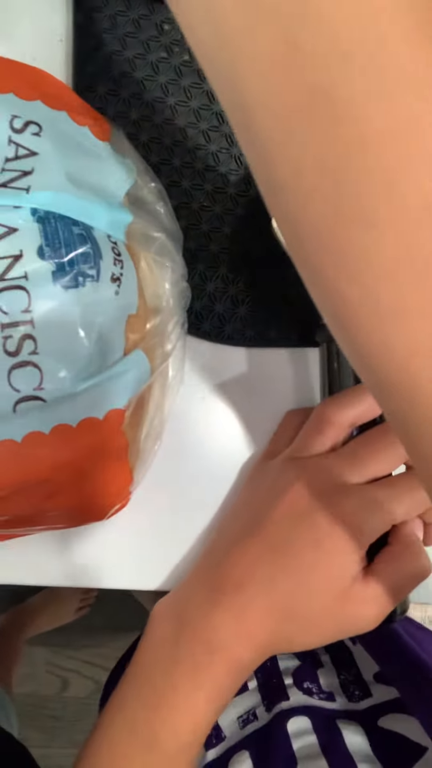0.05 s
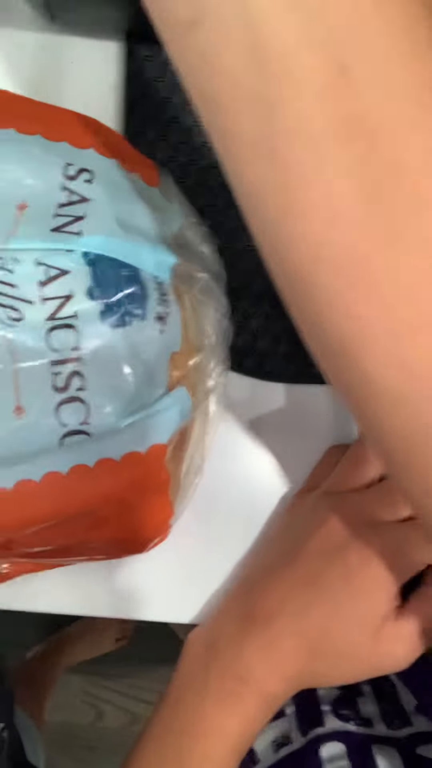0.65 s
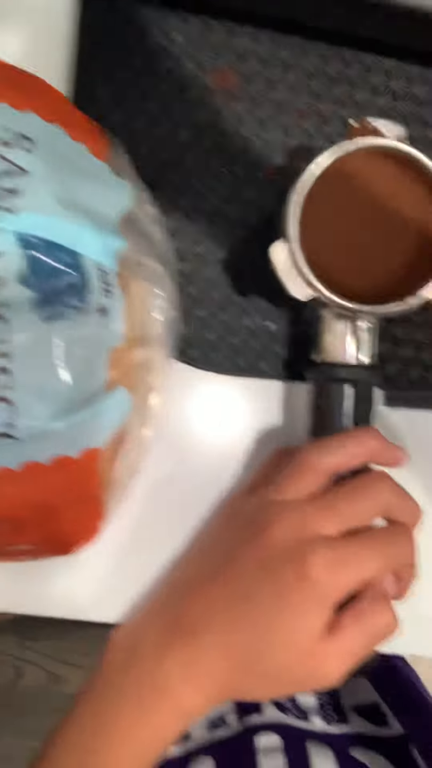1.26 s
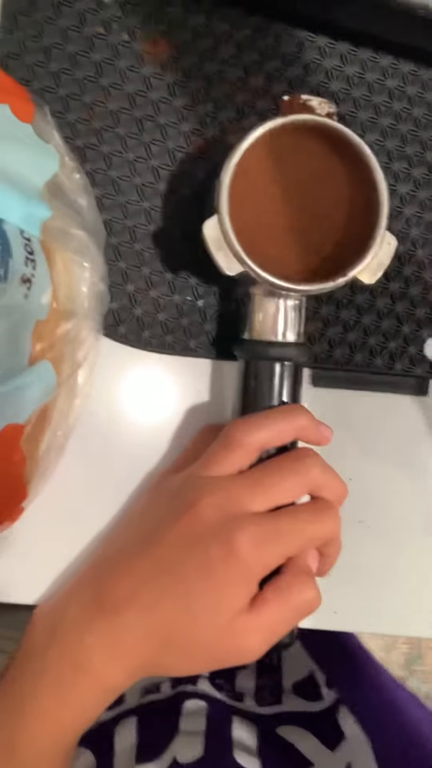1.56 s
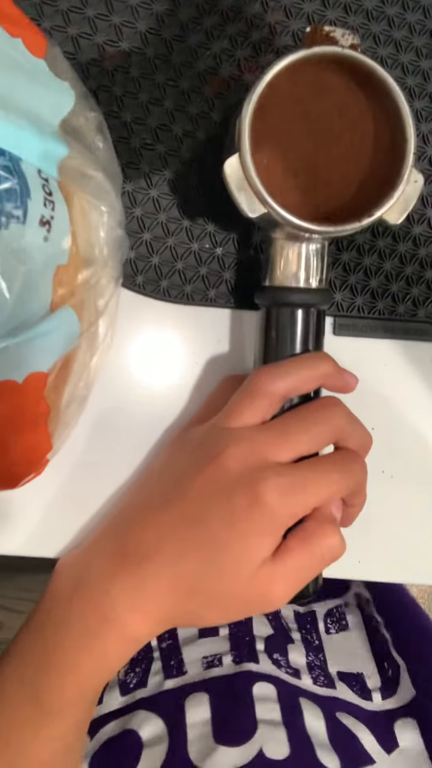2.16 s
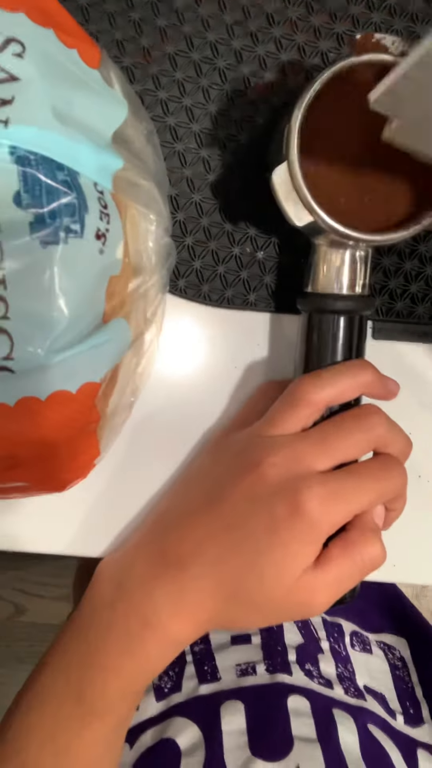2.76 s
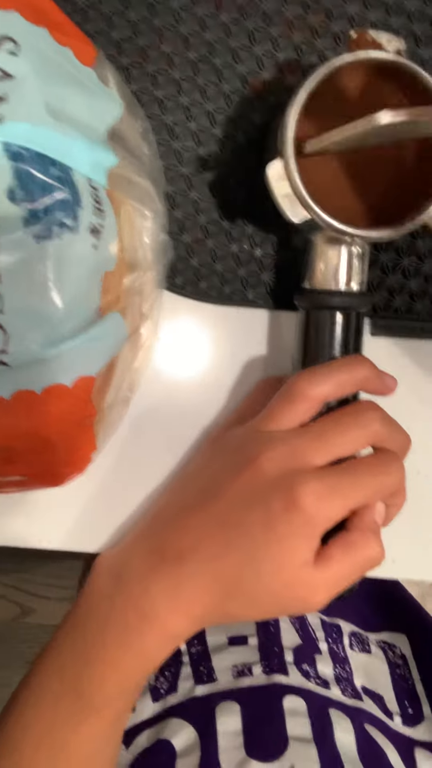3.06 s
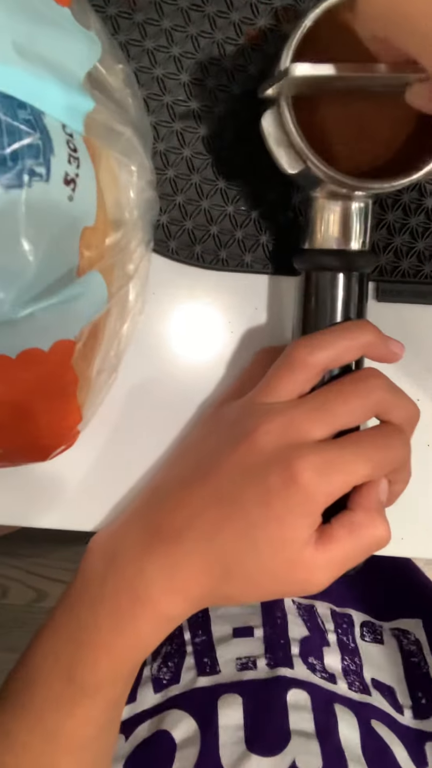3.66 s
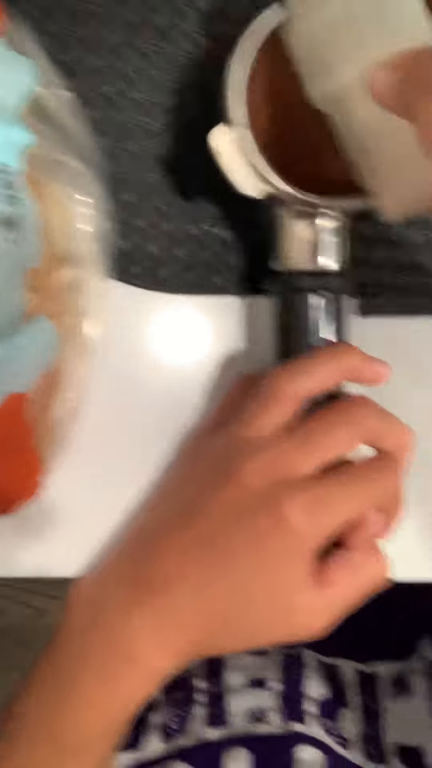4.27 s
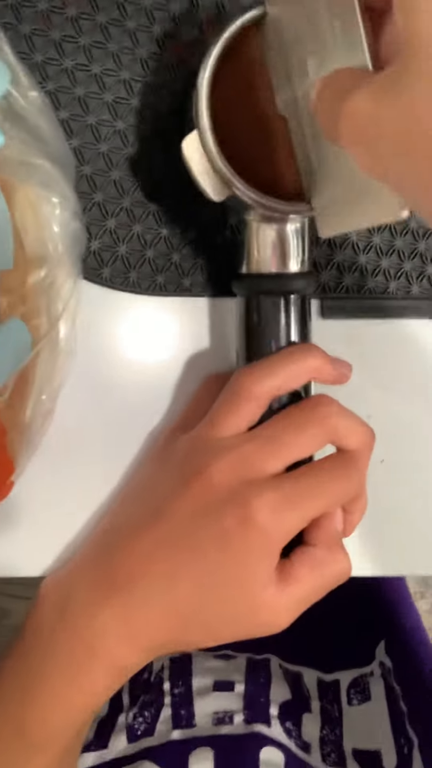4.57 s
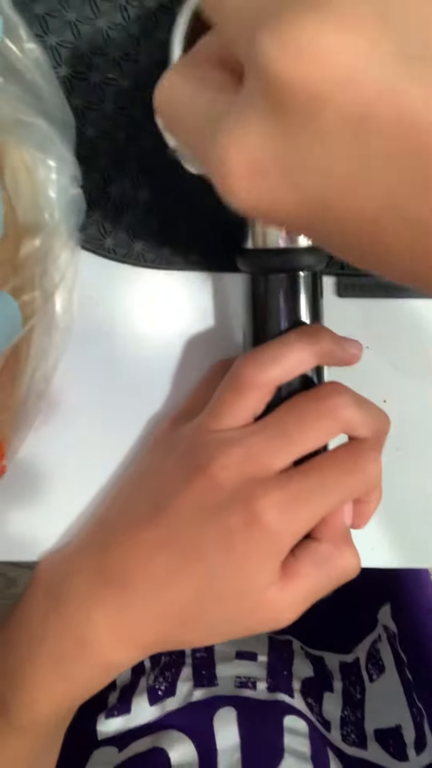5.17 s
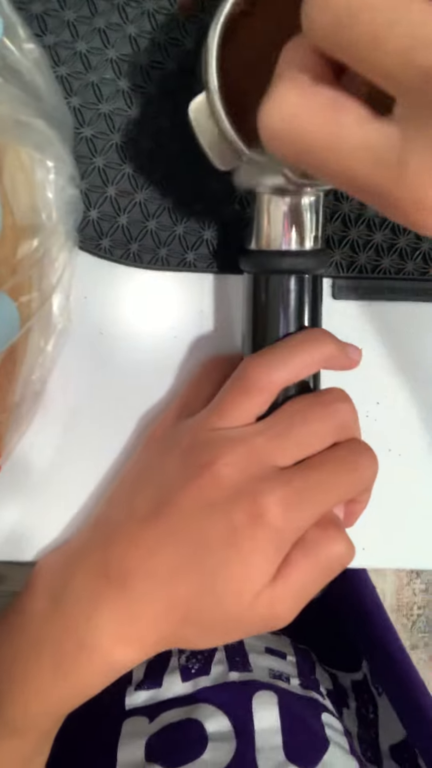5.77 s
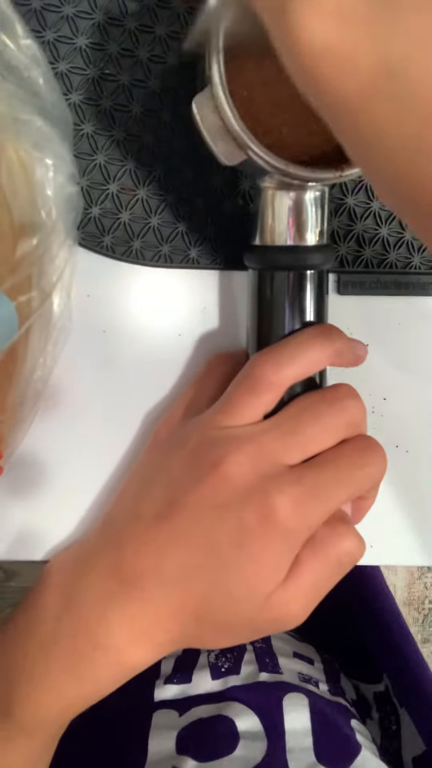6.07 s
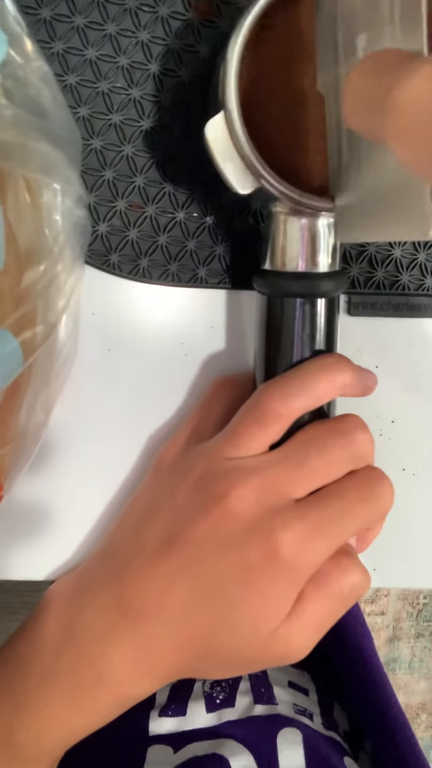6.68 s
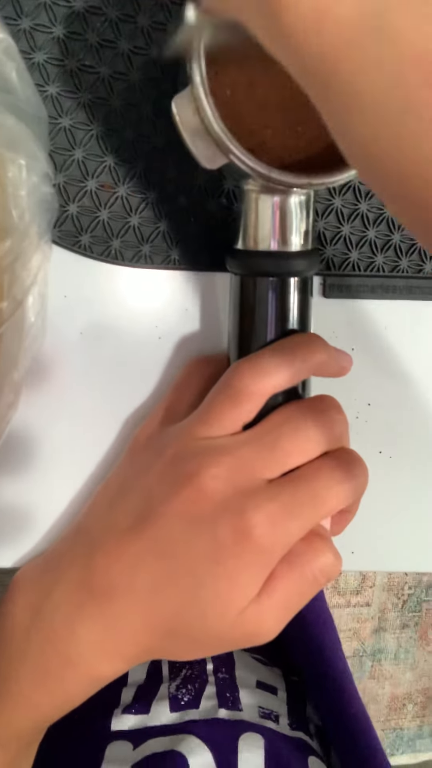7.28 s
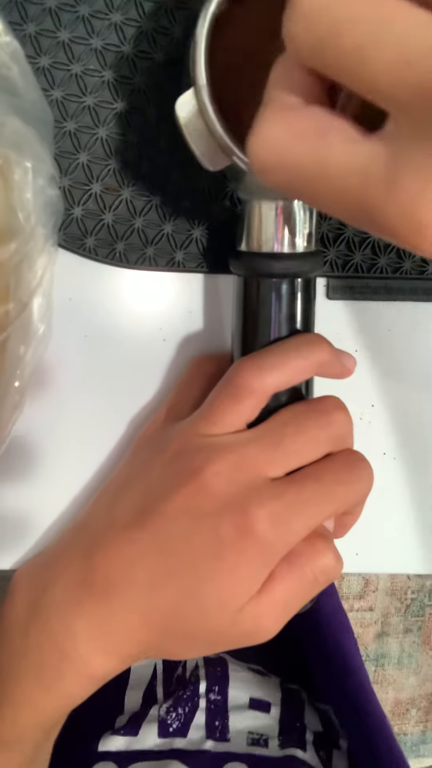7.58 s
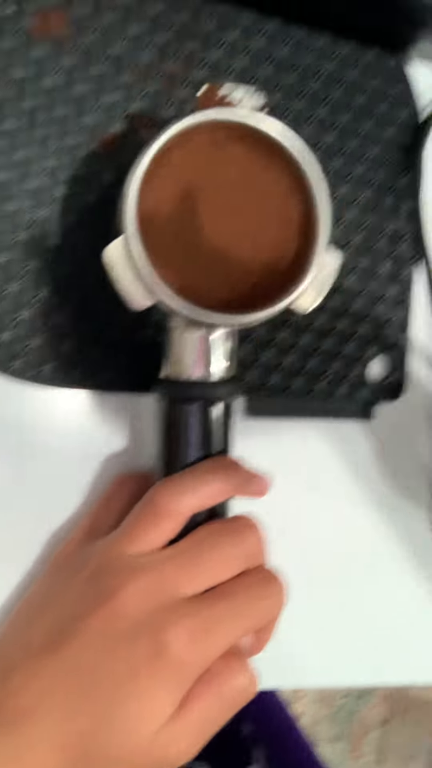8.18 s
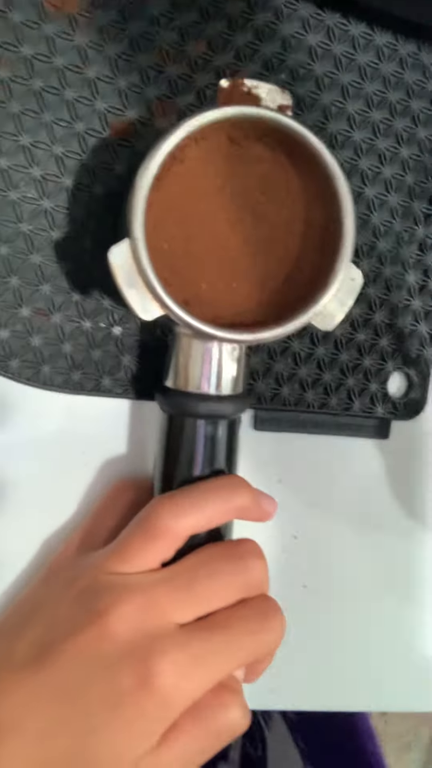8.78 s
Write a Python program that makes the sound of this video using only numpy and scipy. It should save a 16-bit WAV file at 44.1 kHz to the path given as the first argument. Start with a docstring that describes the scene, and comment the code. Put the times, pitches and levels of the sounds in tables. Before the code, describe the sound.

A steel coffee filter holder rubs briefly on a rubber mat and lands with sharp, clinking knocks at about 0.15 and 0.25 seconds. Another hard clack comes at 0.8 seconds, with light taps around it. At 1.6 seconds the holder drags with a short metallic rasp that ends in a loud, briefly ringing clank. Faint tinkles, ticks and finger rustles follow as a thin steel blade is picked up. From about 3.7 to 7.9 seconds the blade turns through the coffee grounds in four quiet strokes, a gritty scraping rustle with a thin hiss on the rim, slight hollow judders, tiny squeaks and an occasional tick. Light taps come around 8 seconds, and the holder is set down with a quick clatter near 8.9 seconds. Everything is close, with a little kitchen reverberation and a faint low rumble underneath.

```python
"""Levelling coffee in a portafilter.

A steel portafilter full of grounds is knocked, dragged and set down on a rubber mat; each blow rings its modes.
A thin steel blade turns round the basket, scraping by stick-slip and ticking on the rim, then the
handle is put down again. Two close microphone ports hear it over a low kitchen rumble."""
import sys
import numpy as np
from scipy import signal
from scipy.fft import rfft, irfft, next_fast_len
from scipy.io import wavfile
from scipy.ndimage import uniform_filter1d, map_coordinates

SR = 44100
rng = np.random.default_rng(int(sys.argv[2]) if len(sys.argv) > 2 else 0)


def file_out(sig):
    """Save sig as 16-bit WAV at sys.argv[1]."""
    # one column per channel
    cols = np.atleast_2d(sig).T
    # limit, then scale
    lim = np.clip(cols, -1, 1)
    pcm = np.round(lim * 32767).astype(np.int16)
    wavfile.write(sys.argv[1], SR, pcm)


N = 398223
TIME_S = np.arange(N) / SR


def amp(db):
    """Decibels to gain."""
    return 10 ** (np.asarray(db) / 20)


def unit(x):
    """Scale to rms 1."""
    return x / np.sqrt(np.mean(x ** 2) + 1e-20)


def along(points, hz):
    """Read (frequency, value) points on a log axis."""
    f, values = np.transpose(points)
    return np.interp(np.log(hz + 1), np.log(f + 1), values)


def gains(rows):
    """Smoothed gain curve per dB column, silent outside the rows."""
    s, *columns = np.transpose(rows)
    curves_db = [np.interp(TIME_S, s, column, left=-150, right=-150) for column in columns]
    return [uniform_filter1d(amp(db), size=300) for db in curves_db]


def bursts(table, attack_s, release_s):
    """Gain curve: each (start, length, level) row rises, holds and decays."""
    gain = np.zeros(N)
    for s, length, db in table:
        age = TIME_S - s
        gain += amp(db) * np.exp(np.minimum(age, 0) / attack_s - np.maximum(age - length, 0) / release_s)
    return gain


def wobble(rate_hz):
    """Smooth random curve with knots at rate_hz."""
    return map_coordinates(rng.standard_normal(int(N * rate_hz / SR) + 4), [TIME_S * rate_hz])


def slips(rate_hz, spread_db):
    """Stick-slip: tiny uneven pushes at random times."""
    size = rng.standard_normal(N) * amp(spread_db * rng.standard_normal(N))
    return unit(size * (rng.random(N) < rate_hz / SR))


def add(track, s, sound):
    """Mix a sound in at time s."""
    part = track[..., round(s * SR):][..., :sound.shape[-1]]
    part += sound[..., :part.shape[-1]]


def filtered(x, response):
    """Apply a complex frequency response."""
    size = x.shape[-1]
    padded = next_fast_len(size + 8192)
    return irfft(rfft(x, padded) * response(np.fft.rfftfreq(padded, 1 / SR)), padded)[..., :size]


def coloured(x, spectrum):
    """Apply a (frequency [Hz], gain [dB]) curve."""
    return filtered(x, lambda hz: amp(along(spectrum, hz)))


def resonant(x, peaks):
    """Parallel resonances: (centre [Hz], width [Hz], gain [dB])."""
    return filtered(x, lambda f: sum(amp(db) * 1j * f * width / (hz * hz - f * f + 1j * f * width)
                                     for hz, width, db in peaks))


def twice_resonant(x, hz, width_hz):
    """Two equal resonances in series."""
    peak = [(hz, width_hz, 0)]
    return resonant(resonant(x, peak), peak)


def narrow_note(path_hz, width_hz):
    """Stick-slip note: narrow noise round a moving pitch."""
    phase = 2 * np.pi * np.cumsum(path_hz) / SR
    a, b = filtered(rng.standard_normal((2, N)), lambda hz: 1 / (1 + 1j * hz / width_hz) ** 2)
    return unit(a * np.cos(phase) + b * np.sin(phase))


def patchy(x, depth_db, span_hz, span_s):
    """Uneven contact: patches of the spectrum swell and fade."""
    hz, t, spectra = signal.stft(x, SR, nperseg=1024)
    grid = np.meshgrid(hz / span_hz, t / span_s, indexing='ij')
    field = map_coordinates(rng.standard_normal((128, 128)), grid, order=1, mode='mirror')
    return signal.istft(spectra * amp(depth_db * field), SR, nperseg=1024)[1][:len(x)]


# Port phase: (frequency [Hz], left minus right [rad])
PORT_PHASE = [(60, 0), (300, -.25), (440, -.6), (580, -1.7), (820, -2.8), (1300, -2.1), (1900, -1.6),
              (3600, -2.1), (5500, -3.7), (6550, -6.2), (9400, -7.5), (12000, -8.9), (16000, -9.4)]
# Port balance: (frequency [Hz], left minus right [dB])
PORT_BALANCE = [(60, 2), (200, 4), (330, 5), (500, 2), (770, -1), (4000, 0.64)]


def ports(x):
    """A close source reaches the left port later, and louder in the low mids."""
    half = np.array([[.5], [-.5]])
    return filtered(x, lambda hz: amp(half * along(PORT_BALANCE, hz))
                    * np.exp(1j * half * along(PORT_PHASE, hz)))


def placed(x):
    """Both ports, with their mean at rms 1."""
    pair = ports(x)
    return pair / pair.mean(0).std()


# Rumble and hiss spectra: (frequency [Hz], gain [dB])
RUMBLE_SPECTRUM = [(13, -49), (22, -23.5), (41, -3.5), (70, 7), (118, 1), (173, -6.5), (269, -12.5),
                   (353, -26.5), (430, -28.5), (550, -45), (920, -120)]
AIR_SPECTRUM = [(180, -25.5), (300, -4.5), (842, -24.5), (1510, -19.5), (4020, -29.5), (6850, -31.5),
                (10600, -30.5), (12300, -50), (16000, -50.5)]
# Rumble envelope: (time [s], relative level [dB])
RUMBLE_ENVELOPE = [(0.0, -57), (0.35, -52), (1.23, -62), (1.68, -53), (2.04, -63), (2.49, -58),
                   (3.59, -70.5), (3.9, -64.5), (5.1, -66), (5.43, -54), (6.77, -69), (7.34, -62),
                   (7.47, -65), (8.9, -60.5), (9.03, -59)]


def background():
    """Restless low rumble, weak wavering hum, faint hiss."""
    rumble = placed(coloured(rng.standard_normal(N), RUMBLE_SPECTRUM))
    rumble *= gains(RUMBLE_ENVELOPE)[0] * amp(3.5 + 2.8 * wobble(14))
    hum = amp(-68.5 + 1.3 * wobble(0.91)) * np.sin(2 * np.pi * 111 * TIME_S + 3.3 * wobble(18))
    hiss = amp(-76.5) * unit(coloured(rng.standard_normal((2, N)), AIR_SPECTRUM))
    return rumble + hum + hiss


# Room decay: (frequency [Hz], t60 [s])
ROOM_DECAY = [(150, 0.45), (500, .52), (1500, 0.48), (4000, 0.33), (9000, 0.24), (13000, 0.1)]
# Wall reflection: (frequency [Hz], gain [dB])
WALL_SPECTRUM = [(100, -6.5), (400, 3), (1500, -1.5), (5000, 1), (10000, 2), (14000, -14)]


def kitchen(x):
    """The coffee machine reflects first; the walls' tail follows, dying faster in the treble."""
    hz, t, spectra = signal.stft(rng.standard_normal((2, SR * 3 // 4)), SR, nperseg=256)
    decay = amp(along(WALL_SPECTRUM, hz)[:, None] - 60 * t / along(ROOM_DECAY, hz)[:, None])
    tail = signal.istft(spectra * decay, SR, nperseg=256)[1]
    age = np.arange(tail.shape[1]) / SR
    early = amp(3 - 60 * age / 0.09)
    response = tail / np.linalg.norm(tail[0]) * (1 + early) * (age > .002)
    return signal.fftconvolve(x, response, axes=1)[:, :N]


# Finger shifts and grip squeezes: (start [s], length [s], level [dB])
FINGER_SHIFTS = [(2.44, 0.13, -83), (3.26, 0.077, -82.5), (5.72, 0.029, -77.5), (8.76, 0.2, -67)]
SQUEEZES = [(2.41, 0.06, -77.5), (2.55, 0.066, -72), (3.272, 0.042, -70), (3.46, 0.069, -70.5),
            (5.645, 0.035, -72.5)]
# Skin friction: (frequency [Hz], gain [dB])
SKIN_SPECTRUM = [(200, -6), (500, 3), (700, -11.5), (1000, -10), (2200, -8), (4000, -18.5), (10000, -31)]


def fingers():
    """Skin rustles on handle and blade; a squeeze gives a hollow rub."""
    pressure = bursts(FINGER_SHIFTS, attack_s=0.0086, release_s=0.036) * amp(1.8 * wobble(32))
    rub = placed(twice_resonant(slips(3100, spread_db=6), hz=486, width_hz=120))
    rustle = placed(coloured(slips(3800, spread_db=-3.5), SKIN_SPECTRUM))
    return pressure * rustle + bursts(SQUEEZES, attack_s=0.004, release_s=0.013) * rub


# Rim modes: (frequency [Hz], width [Hz], relative level [dB])
RIM_RESONANCES = [(6850, 140, -4), (9000, 130, 2.5), (10650, 110, -3), (12550, 110, -8)]


def rim_ring(swell_db, drift_hz):
    """Rim modes swell unevenly and wander as the contact point moves."""
    return unit(sum(amp(db + swell_db * wobble(8.3)) * narrow_note(hz + drift_hz * wobble(9.1), width)
                    for hz, width, db in RIM_RESONANCES))


# Blade picked up and brought to the basket: (start [s], length [s], level [dB])
PICKUP_SCUFFS = [(2.045, 0.012, -68), (2.07, .11, -82), (2.345, 0.019, -77.5), (2.44, 0.026, -80.5),
                 (2.495, 0.0095, -71), (2.615, 0.0187, -68), (2.93, 0.035, -81.5), (3.271, 0.0072, -70.5)]


def tinkles():
    """Short dry scuffs set thin steel ringing faintly."""
    bright = [(1200, -12), (3000, 8), (4800, -3), (9000, 0), (13000, 1), (15000, -20)]
    scratch = unit(coloured(slips(2500, spread_db=3), bright))
    tinkle = placed(rim_ring(swell_db=3, drift_hz=30) + amp(-3.5) * scratch)
    return tinkle * bursts(PICKUP_SCUFFS, attack_s=0.0034, release_s=0.009)


# Blade squeaks: (start [s], length [s], pitch [Hz], relative level [dB])
EDGE_SQUEAKS = [(3.959, 0.15, 1156, -72.5), (5.987, 0.05, 1710, -72), (6.26, 0.14, 1220, -64.5),
                (7.654, 0.16, 3230, -78)]


def squeaks():
    """Stick-slip at the edge drives one narrow resonance at a time."""
    out = np.zeros(N)
    for s, length, hz, db in EDGE_SQUEAKS:
        tone = unit(twice_resonant(slips(3500, spread_db=3), hz, width_hz=300))
        out += tone * bursts([(s, length, db)], attack_s=0.01, release_s=0.012)
    return amp(11.5) * ports(out)


# Blade turns: (peak time [s], half width [s])
BLADE_TURNS = [(3.869, 0.24), (4.98, 0.25), (6.011, 0.12), (7.249, 0.11)]


def turning(x, low_hz, top_hz, width_hz, boost_db):
    """The scrape's resonance climbs and falls back once a stroke as the blade turns."""
    hz, t, spectra = signal.stft(x, SR, nperseg=1024)
    height = sum(np.exp(-((t - s) / half_width) ** 4) for s, half_width in BLADE_TURNS)
    centre_hz = low_hz + (top_hz - low_hz) * height
    offset = (hz[:, None] - centre_hz) / width_hz
    return signal.istft(spectra * amp(boost_db / (1 + offset ** 2)), SR, nperseg=1024)[1][:len(x)]


# Shaved coffee: (frequency [Hz], gain [dB])
GROUNDS_SPECTRUM = [(120, -3.5), (280, -0.5), (400, -4), (700, -0.5), (950, -3), (1200, 1), (1550, -5),
                    (1900, -2.5), (2600, -9), (3300, -9), (4200, -10.5), (5200, -25.5), (7000, -33)]


def grounds_crunch():
    """Fine grounds crunch densely; coarse grains snap one by one."""
    fine = patchy(slips(6000, spread_db=2), depth_db=5, span_hz=150, span_s=.07)
    coarse = slips(220, spread_db=1)
    crunch = coloured(unit(fine) + amp(-9) * coarse, GROUNDS_SPECTRUM)
    return placed(turning(crunch, low_hz=1227, top_hz=1830, width_hz=170, boost_db=7))


# Blade on rim: (frequency [Hz], gain [dB])
RIM_SPECTRUM = [(4500, -23), (5700, -15), (6500, -10.5), (7600, -6), (8300, -3), (9100, 5), (9800, -5),
                (10700, -0.5), (11600, -12.5), (12500, 3.5), (14000, -15), (16000, -38)]


def rim_hiss():
    """The edge slips over burrs and rings the rim."""
    burrs = patchy(slips(6000, spread_db=2), depth_db=5, span_hz=260, span_s=.11)
    ring = amp(0.5) * rim_ring(swell_db=3.5, drift_hz=45.2)
    return placed(unit(coloured(burrs, RIM_SPECTRUM)) + ring) * amp(1.2 * wobble(11))


# Catching edge: (frequency [Hz], gain [dB])
CATCH_SPECTRUM = [(400, -5.5), (1000, 3), (1800, 7), (2500, -8), (3400, -3), (4300, -8), (5300, -12),
                  (6500, -17.5), (8000, -12.5), (14000, -35.5)]


def catch_rasp():
    """Rough stick-slip of a catching edge."""
    bite = coloured(slips(4000, spread_db=3), CATCH_SPECTRUM)
    return placed(patchy(bite, depth_db=4.5, span_hz=204, span_s=.05))


# Blade flex note: (time [s], pitch [Hz])
FLEX_NOTE = [(3.759, 560), (4.08, 517), (4.18, 530), (4.33, 482), (4.93, 460), (5.12, 509), (5.25, 507.2),
             (5.45, 487.8), (7.2, 475.3), (7.46, 482.8), (7.61, 531), (7.78, 481.6)]


def blade_flex():
    """The blade's hollow note bends as it is pressed and turned."""
    skirt = unit(twice_resonant(slips(2000, spread_db=3), hz=505.5, width_hz=95))
    pitch_hz = np.interp(TIME_S, *np.transpose(FLEX_NOTE)) + 13 * wobble(22)
    return placed(narrow_note(pitch_hz, width_hz=36) + amp(-5) * skirt)


# Four strokes, one curve each: (time [s], relative grounds level [dB], relative rim level [dB])
BLADE_STROKES = [
    [(3.69, -85, -90.5), (3.768, -62.5, -74), (3.884, -69.5, -77.5), (4.076, -56, -70), (4.1, -65.5, -75.5),
     (4.146, -57, -62.5), (4.386, -73.5, -76.5), (4.42, -63.5, -69), (4.53, -86, -106)],
    [(4.56, -97, -105), (4.608, -60, -61.5), (4.846, -59, -65), (4.868, -54.5, -77), (4.89, -62.5, -70),
     (4.986, -60, -60.5), (5.35, -65.5, -76), (5.426, -62.5, -71), (5.49, -85, -91)],
    [(5.68, -73, -87), (5.862, -61, -67.5), (5.996, -65.5, -84), (6.02, -60.5, -71), (6.056, -65, -73),
     (6.358, -60, -65.5), (6.376, -57, -59), (6.656, -80.5, -80.5), (6.69, -81.5, -101)],
    [(6.87, -101, -100.5), (6.906, -75, -76.5), (6.962, -59, -64), (7.096, -59.5, -62.5),
     (7.164, -57.5, -66), (7.44, -61, -68), (7.592, -59, -67), (7.788, -66, -63), (7.88, -83.5, -89)],
]
# Catches and judders: (start [s], length [s], relative level [dB])
BLADE_CATCHES = [(3.76, 0.02, -63.5), (4.01, 0.06, -62), (4.073, 0.008, -59), (4.84, 0.035, -60.5),
                 (6.14, 0.049, -64), (6.59, 0.0703, -71.5), (6.72, 0.025, -76.5), (7.13, 0.066, -54.5),
                 (7.238, 0.023, -55.5), (7.895, 0.0622, -76.5)]
BLADE_JUDDERS = [(3.76, 0.073, -62.5), (4.08, 0.21, -55.5), (4.32, 0.15, -71), (4.6, 0.1, -68.5),
                 (4.93, 0.25, -61), (5.24, 0.2, -57), (5.8, 0.08, -69), (6.73, 0.021, -69.5),
                 (7.18, 0.14, -62), (7.46, 0.31, -57)]
# Grains cracking between blade and rim: (time [s], relative level [dB])
GRAIN_CRACKS = [(4.135, -58), (4.258, -58), (4.42, -63), (5.18, -59), (7.005, -64), (7.777, -58)]


def blade():
    """The blade shaves the grounds, hisses on the rim, rasps when it catches, judders when it sticks."""
    on_grounds, on_rim = np.sum([gains(stroke) for stroke in BLADE_STROKES], axis=0)
    catches = bursts(BLADE_CATCHES, attack_s=0.0039, release_s=0.0023)
    cracks = bursts([(s, 0, db) for s, db in GRAIN_CRACKS], attack_s=0.0009, release_s=0.0043)
    judders = bursts(BLADE_JUDDERS, attack_s=0.023, release_s=0.021)
    grip = amp(1.4 * wobble(28))
    crunch = amp(-2.3) * on_grounds * grounds_crunch()
    hiss = amp(-0.85) * (np.hypot(on_rim, amp(-8.5) * catches) + cracks) * rim_hiss()
    rasp = catches * catch_rasp()
    flex = amp(0.63) * np.hypot(judders, amp(-14.5) * on_grounds) * blade_flex()
    grit = unit(amp(1.6 * wobble(140)))  # the edge bites and lets go
    return grip * (grit * (crunch + hiss + rasp) + flex)


# Handle on mat: (time [s], relative level [dB])
MAT_ENVELOPE = [(0.026, -57.5), (0.045, -48.5), (0.07, -41.5), (0.078, -36), (0.11, -42.5), (0.14, -41)]
# Rubber resonances: (frequency [Hz], width [Hz], gain [dB])
MAT_RESONANCES = [(323, 98, -3.5), (445, 55, -4.5), (700, 27, 1), (1210, 90, -15.5)]


def mat_rub():
    """The handle groans over rubber by stick-slip."""
    soft = [(150, -1.0), (300, 2.5), (800, -9.5), (1500, -12.5), (3000, -15), (10000, -23.0)]
    groan = coloured(resonant(slips(7300, spread_db=4.0), MAT_RESONANCES), soft)
    return amp(4.5) * gains(MAT_ENVELOPE)[0] * placed(groan)


# Drag rasp and rim ring: (time [s], level [dB])
DRAG_ENVELOPE = [(1.6, -71), (1.618, -46.5), (1.632, -35), (1.7, -34), (1.716, -35.5), (1.72, -32.5)]
DRAG_RING_ENVELOPE = [(1.665, -71.5), (1.7, -53.5), (1.73, -54)]
# Steel-on-steel resonances: (frequency [Hz], width [Hz], gain [dB])
DRAG_RESONANCES = [(306, 88, 1.5), (676, 170, 2), (1189, 90, -4.5), (1484, 110, 1), (1613, 110, 1),
                   (1780, 93, 0.5), (2400, 170, -4.5)]


def steel_drag():
    """The portafilter chatters over steel; the rim rings as the drag speeds up."""
    dull = [(2600, 2.5), (3400, -11.5), (10000, -20.5), (14000, -29.5)]
    chatter = coloured(resonant(slips(2700, spread_db=1.5), DRAG_RESONANCES), dull)
    rasp = placed(patchy(chatter, depth_db=3, span_hz=217, span_s=0.027))
    ring = placed(rim_ring(swell_db=2, drift_hz=30.4))
    return gains(DRAG_ENVELOPE)[0] * rasp + gains(DRAG_RING_ENVELOPE)[0] * ring


# Weight settling on the mat, steel clinking: (time [s], frequency [Hz], level [dB], t60 [s])
MAT_BUMPS = [(0.151, 239, -24, 0.1), (0.168, 356, -24, 0.046), (0.261, 299, -18.5, 0.061),
             (0.7741, 321, -13, 0.097), (0.776, 223, -16.5, 0.1), (0.814, 266, -27.5, 0.046),
             (0.852, 293.9, -25.5, 0.075), (8.184, 75.85, -36.5, 0.083), (8.889, 288, -24.5, 0.055),
             (8.929, 136, -23, 0.09)]
STEEL_CLINKS = [(0.147, 1228, -24, 0.17), (0.147, 3205, -31, 0.11), (0.15, 1440, -27, 0.16),
                (0.157, 859, -16.5, 0.081), (0.256, 1287, -17, 0.059), (0.2615, 2064, -24, 0.033),
                (0.772, 1814, -21.5, 0.061), (1.732, 1885, -18, 0.079), (1.732, 1414, -19, 0.055),
                (1.732, 726, -53.5, 1.1), (1.74, 450, -28, 0.18), (8.857, 1917, -12.5, 0.025)]


def struck_modes(table):
    """Each row is one strong mode, struck and dying away."""
    out, t = np.zeros(N), np.arange(SR) / SR
    onset = 1 - np.exp(-t / 0.00025)
    for s, hz, db, t60 in table:
        add(out, s, amp(db - 60 * t / t60) * np.sin(2 * np.pi * hz * t) * onset)
    return ports(out)


# Portafilter and basket modes: (frequency [Hz], relative level [dB], t60 before damping [s])
STEEL_MODES = [(241, 1, 0.16), (306, 2.5, 0.14), (393, -2.5, 0.32), (442, -4.5, 0.62), (513, -2, 0.48),
               (586.3, -2, 0.25), (687.3, 2, 0.22), (775, -1, 0.1), (858, 3, 0.2), (1006, 3, 0.17),
               (1140, -2, 0.12), (1302, 1, 0.09), (1434, 3, 0.14), (1553, -1, 0.2), (1684, 2, 0.25),
               (1900, 3.5, .16), (2090, 1.5, 0.12), (2207, 0, 0.14), (2260, -1, 0.1), (2610, -4.5, 0.051),
               (3240, -3, 0.14), (3860, -5, 0.13), (5400, -3, 0.1), (7100, -5, 0.25), (8450, 0.5, 0.16),
               (8920, 5.5, 0.15), (10770, -4.5, 0.1)]
# Impact spectrum: (frequency [Hz], gain [dB])
IMPACT_SPECTRUM = [(100, -10), (200, 1), (300, -2), (420, -4), (620, 2), (900, 1), (1900, -5.5),
                   (2700, -12.5), (4200, -10), (6500, -26), (10500, -26), (12500, -32.5), (16000, -37)]
# Thud, knock, clank, ring, tick and snap bands: (edge [Hz])
BAND_EDGES_HZ = [110, 450, 1200, 2600, 6000, 11500, 16000]
# Light touches of blade and handle: (time [s], five levels thud to tick before trim [dB], wash t60 [s])
LIGHT_TAPS = [(0.466, -41, -46, -55, -59.5, -80, 0.066), (0.586, -50, -55, -53.5, -77, -79, 0.1),
              (0.62, -59.5, -64, -70, -72.5, -76, 0.41), (1.088, -71, -64, -65, -67.5, -74, 0.14),
              (1.124, -57.5, -62.5, -66.5, -74, -74.5, 0.084),
              (1.383, -50.5, -57.5, -80.5, -80.5, -87, 0.028), (1.53, -53, -65.5, -61, -76.5, -84, 0.058),
              (3.271, -66.5, -68, -73, -80.5, -79, 0.039), (3.48, -69, -60, -57, -72, -81, 0.12),
              (3.543, -71, -61.5, -51, -57, -75, 0.035), (3.58, -51.5, -46.5, -63.5, -77.5, -92, 0.015),
              (3.774, -55.5, -58.5, -57, -68, -66.5, 0.028),
              (4.445, -55.5, -62, -67.5, -81.5, -86.5, 0.024), (4.864, -61, -57, -51.5, -55.5, -77, 0.034),
              (5.511, -46.5, -47.5, -42, -54, -67.5, 0.021), (7.997, -56, -60.5, -61.5, -67.5, -78, 0.04),
              (8.043, -57.5, -68, -72, -82, -90.5, 0.019), (8.175, -61.5, -48, -54.5, -61.5, -78.5, 0.043)]
# Portafilter blows: (time [s], six levels thud to snap before trim [dB], wash t60 [s])
HARD_KNOCKS = [(0.147, -23, -16.5, -19, -31, -40.5, -52, 0.037),
               (0.157, -25.5, -18.5, -24.5, -37, -47, -62, 0.074),
               (0.171, -23, -28, -25, -42, -52, -72, 0.012),
               (0.254, -24.5, -14.5, -13.5, -23, -40, -67, 0.017),
               (0.2615, -34.5, -22, -9.5, -28, -43, -71, 0.042),
               (0.7695, -19.5, -13.5, -25, -19.5, -31.5, -25.5, 0.011),
               (0.7735, -19.5, -19, -15, -29, -47, -60.5, 0.075),
               (1.721, -41.5, -36.5, -16.5, -32, -49, -61, 0.08),
               (1.732, -30.5, -23, -9, -21, -32.5, -44, 0.016),
               (1.74, -33.5, -32.5, -23, -49, -62, -64, 0.09),
               (1.755, -31, -24, -22.5, -35.5, -56, -74.5, 0.045),
               (8.857, -35.5, -30.5, -16, -36.5, -62, -76.5, 0.03),
               (8.865, -29.5, -30, -19.5, -30.5, -56.5, -79, 0.027),
               (8.889, -32, -29.5, -25.5, -46, -70, -88, 0.038),
               (8.902, -37, -31, -28, -48, -66, -91, 0.049),
               (8.924, -36, -33, -50, -44.5, -60.5, -85, 0.022)]


def impacts(table, modes_db, damping, crack_db, rise_s, trim_db):
    """Each contact rings the main modes over a wash of short ones; hardness sets the band levels."""
    out, t = np.zeros((2, N)), np.arange(SR // 6) / SR
    mode_hz, mode_db, mode_t60 = np.transpose(STEEL_MODES)[:, :, None]
    bands = [signal.butter(3, edges, 'band', fs=SR, output='sos')
             for edges in zip(BAND_EDGES_HZ, BAND_EDGES_HZ[1:])]
    for s, *levels_db, wash_t60 in table:
        # impact point and grip change each mode's share and pitch
        share, detune = rng.standard_normal((2, *mode_hz.shape))
        start_db = mode_db + along(IMPACT_SPECTRUM, mode_hz) + 2.5 * share
        phase = 2 * np.pi * (mode_hz * (1 + .003 * detune) * t + rng.random(mode_hz.shape))
        ring = np.sum(amp(start_db - 60 * t * damping / mode_t60) * np.sin(phase), axis=0)
        noise = patchy(rng.standard_normal(len(t)), depth_db=2.8, span_hz=130, span_s=.3)
        wash = unit(coloured(noise, IMPACT_SPECTRUM))
        wash *= amp(-60 * t / wash_t60) + amp(crack_db - 60 * t / 0.002)
        blow = ports((amp(modes_db) * ring + wash) * (1 - np.exp(-t / rise_s)))
        for sos, db, offset_db in zip(bands, levels_db, trim_db):
            band = signal.sosfilt(sos, blow)
            onset_rms = band[:, :SR // 83].std()  # first 12 ms
            add(out, s, band * amp(db + offset_db) / onset_rms)
    return out


# Lift from the counter top: (frequency [Hz], gain [dB])
COUNTER_LIFT = [(100, 0), (310, 2), (470, 0.5), (900, 4), (1400, 0.5), (3200, 1), (5000, 2), (8000, -1)]


def scene():
    """Close sources on the counter, their reflections and the background."""
    knocks = impacts(HARD_KNOCKS, modes_db=-14, damping=3.6, crack_db=7.0, rise_s=0.0023,
                     trim_db=[-2, -2.5, -7.5, -4.5, -0.5, -1.5])
    taps = impacts(LIGHT_TAPS, modes_db=-19.5, damping=8.0, crack_db=14.5, rise_s=0.00078,
                   trim_db=[-3.5, 2.84, 1.18, 1.84, 0.76])
    close = knocks + taps + tinkles() + struck_modes(MAT_BUMPS) + struck_modes(STEEL_CLINKS)
    close += mat_rub() + steel_drag() + blade() + squeaks() + fingers()
    return coloured(close, COUNTER_LIFT) + amp(-14.5) * kitchen(close) + background()


def record(dry):
    """Soft peak limit, low cut and band limit."""
    low_cut_hz, top_hz = 29, 16600
    rounded = dry / (1 + np.abs(dry / .9) ** 6) ** (1 / 6)
    return filtered(rounded, lambda hz: (hz < top_hz) * (1j * hz / (low_cut_hz + 1j * hz)) ** 2)


dry = scene()
out = record(dry)
file_out(out)
```